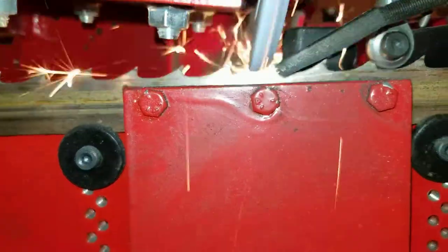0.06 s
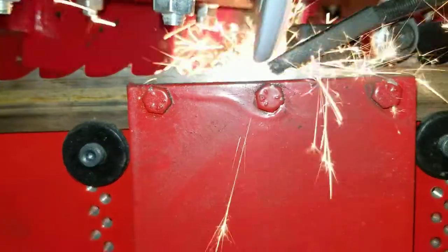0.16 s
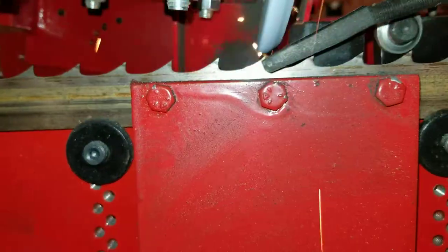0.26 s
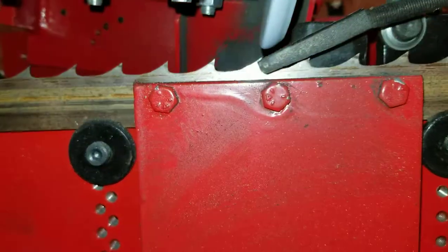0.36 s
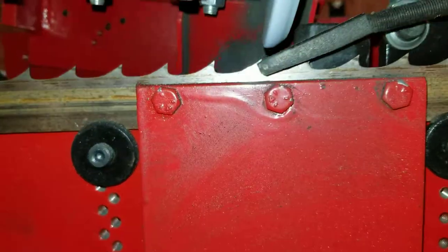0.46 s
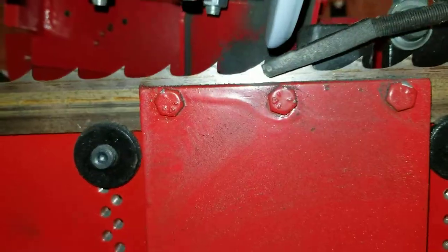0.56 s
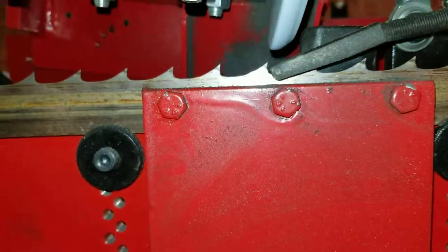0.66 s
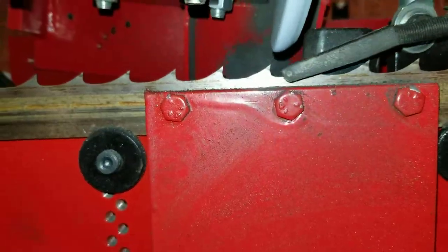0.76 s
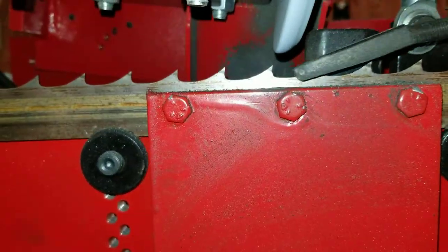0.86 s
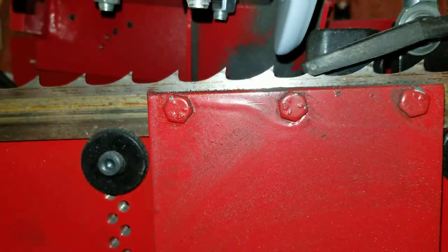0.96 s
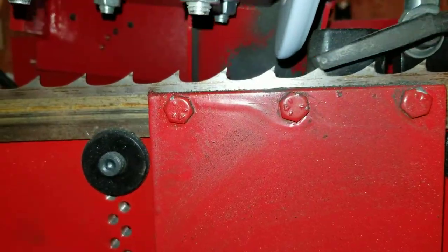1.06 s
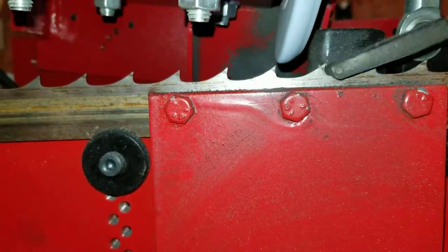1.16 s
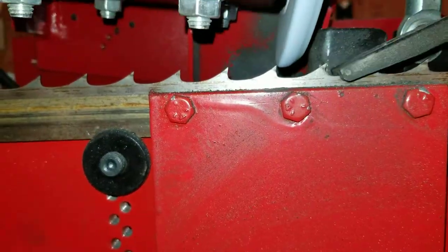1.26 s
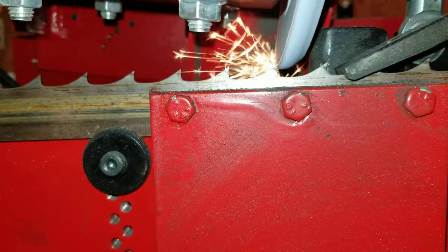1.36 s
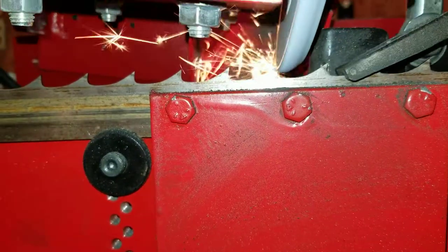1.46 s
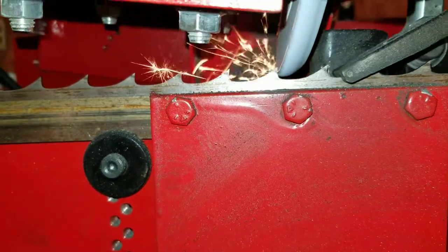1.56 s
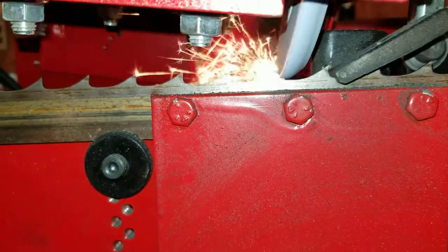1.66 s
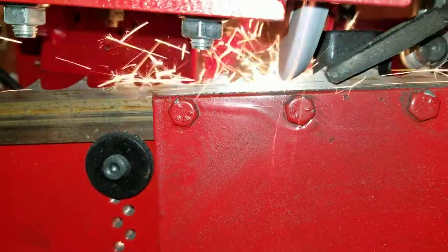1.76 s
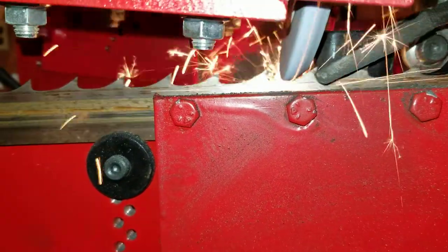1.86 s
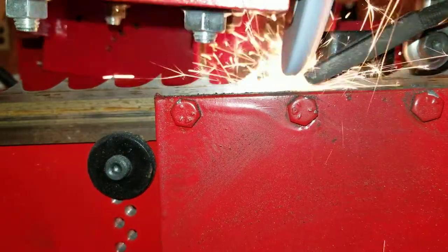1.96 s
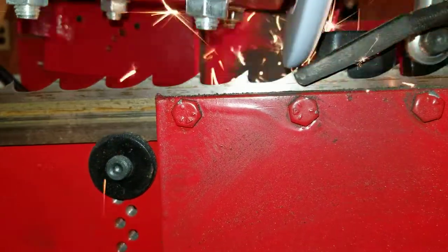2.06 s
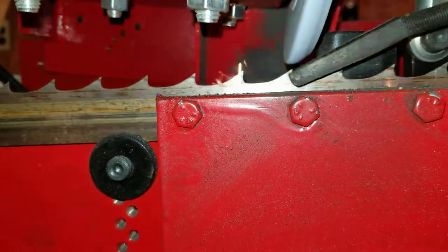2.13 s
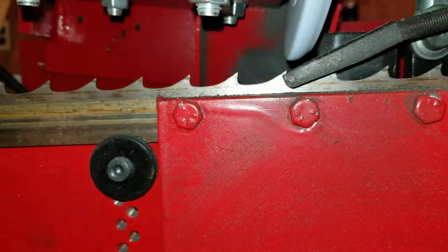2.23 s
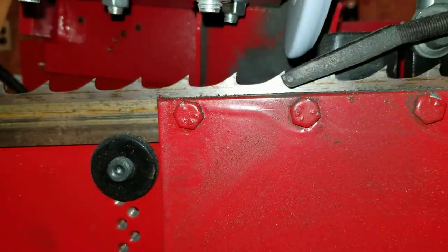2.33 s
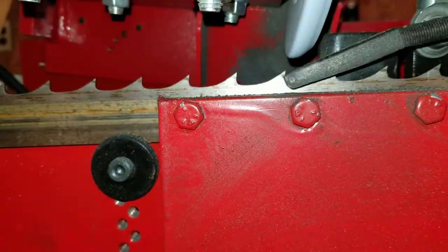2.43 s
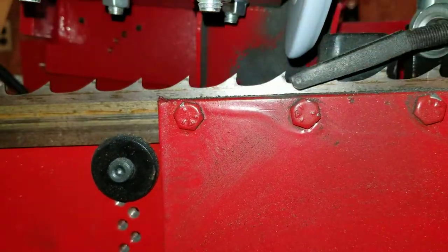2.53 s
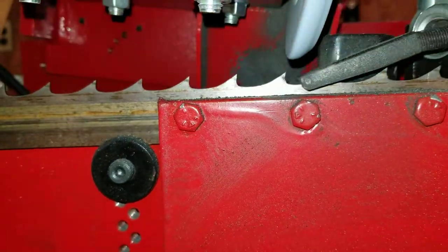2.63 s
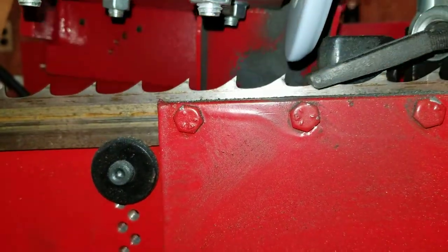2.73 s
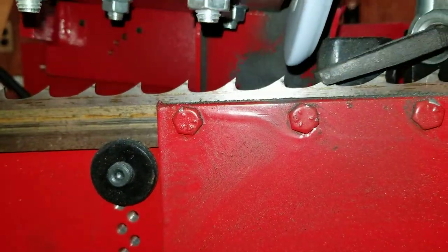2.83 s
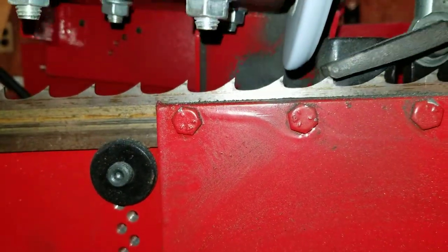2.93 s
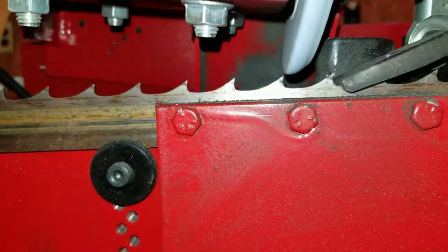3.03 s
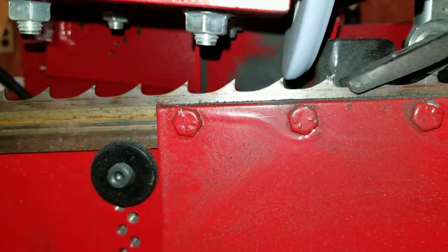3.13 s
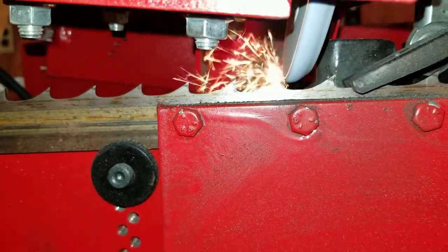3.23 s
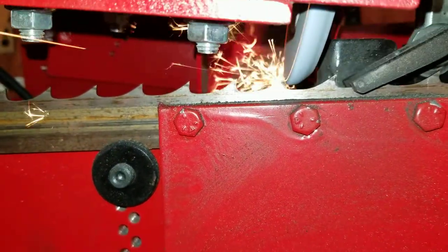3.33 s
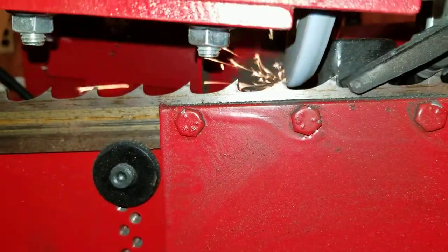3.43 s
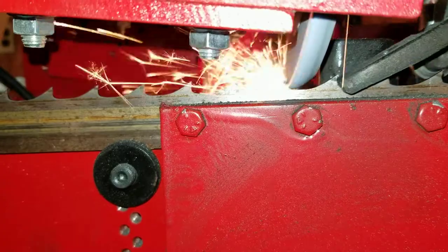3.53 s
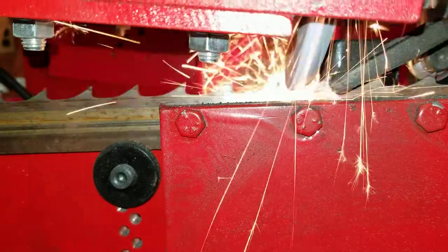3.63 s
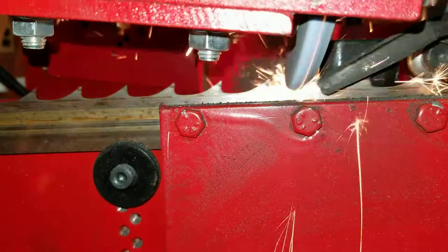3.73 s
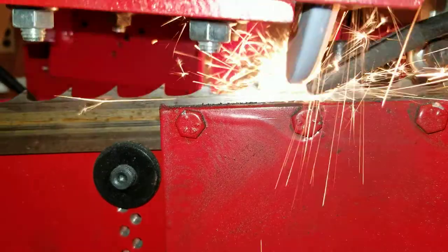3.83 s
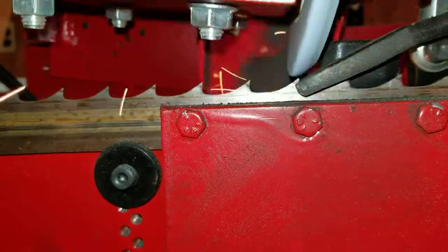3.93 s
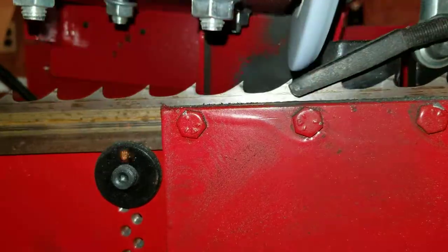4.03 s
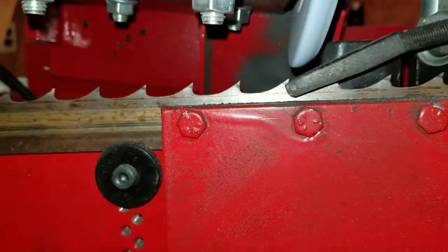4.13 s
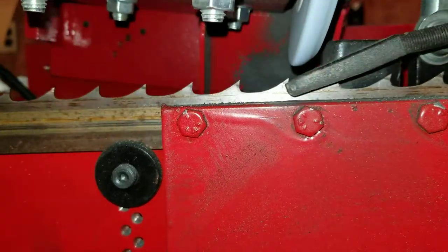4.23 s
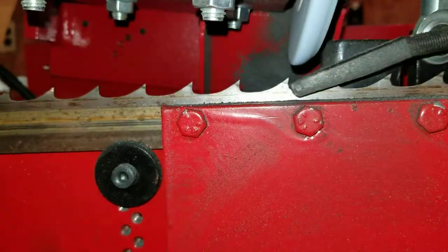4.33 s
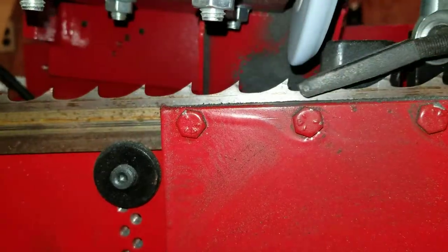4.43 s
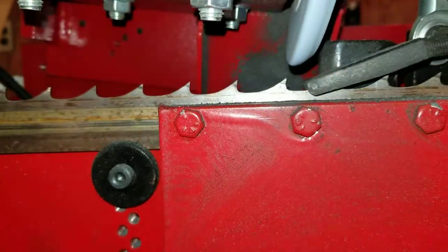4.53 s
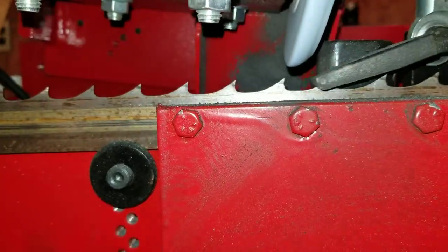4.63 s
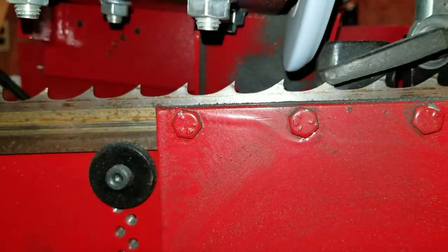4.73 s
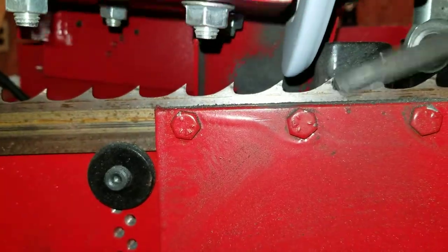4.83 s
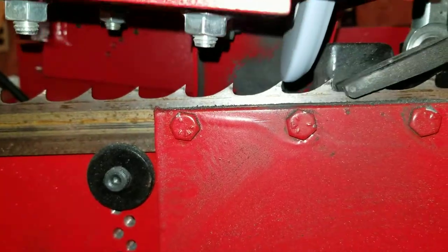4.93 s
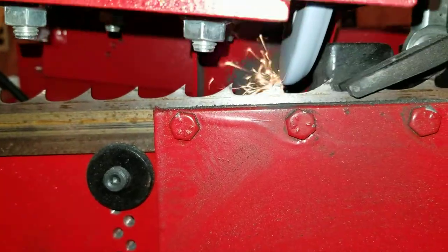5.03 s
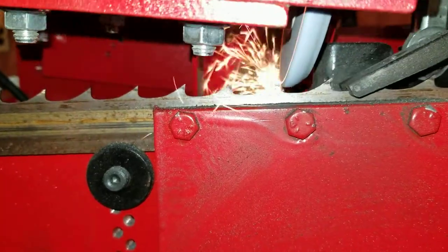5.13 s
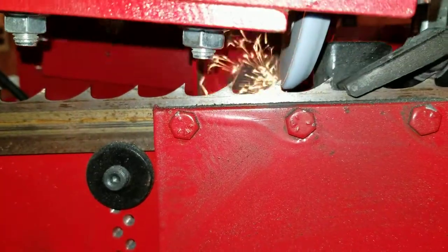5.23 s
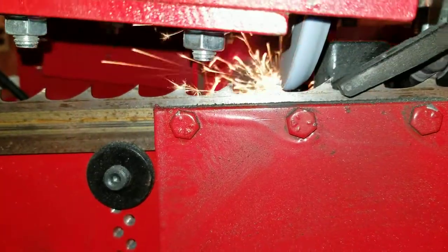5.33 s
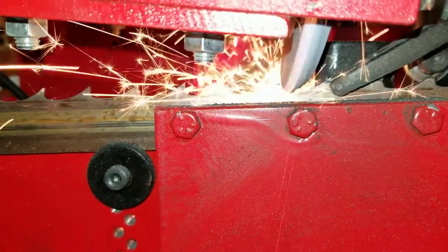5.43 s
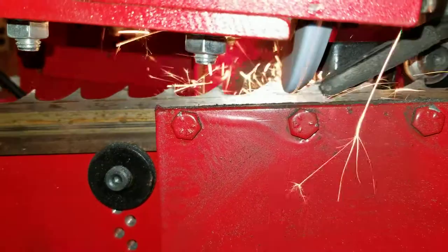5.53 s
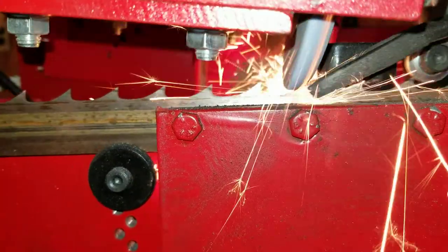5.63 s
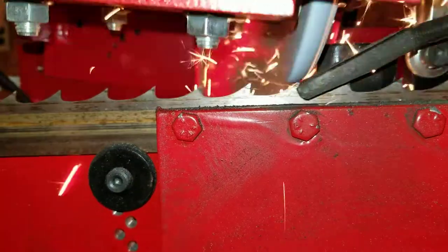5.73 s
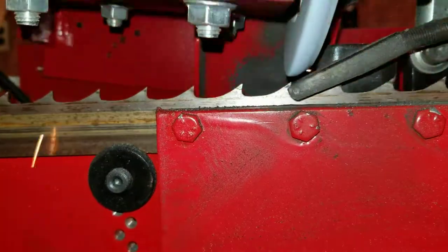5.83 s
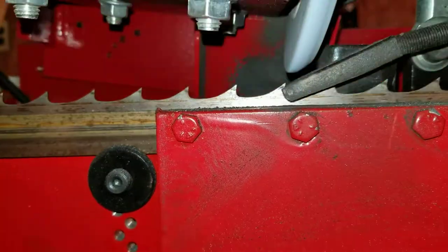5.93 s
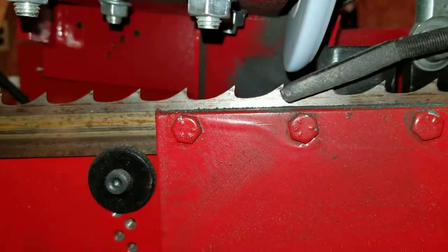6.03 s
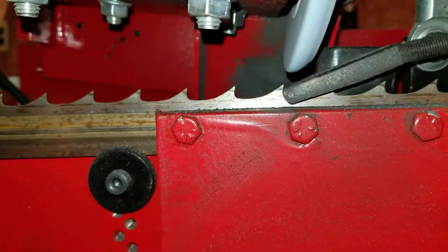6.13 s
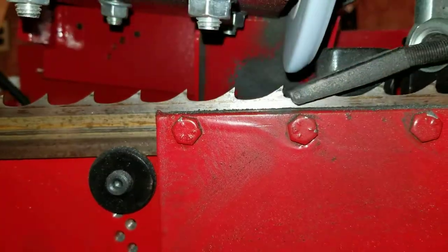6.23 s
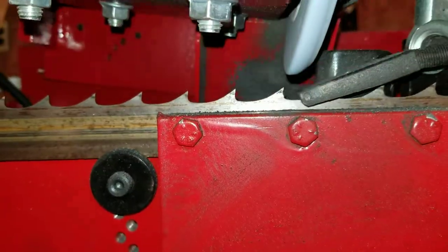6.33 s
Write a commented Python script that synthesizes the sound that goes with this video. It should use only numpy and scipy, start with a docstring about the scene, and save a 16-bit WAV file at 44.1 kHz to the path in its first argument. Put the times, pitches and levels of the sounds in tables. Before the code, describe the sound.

Bright, hissing metal scrapes come and go every two seconds as a sharpener grinds saw teeth, while its motor hums and small clicks mark each feed.

```python
"""An automatic sharpener's wheel grinds a band saw blade in a small workshop, heard from very close.
Per tooth it scrapes face, gullet and back: shaped noise plus blade resonances, as grit cuts the steel.
High-passed-sounding noise spits are the sparks; the steel frame rings on after the back is ground.
A motor hum, spindle whir, belt tones and air rush run throughout.
Before each later stroke a pawl clicks, a decaying noise burst, and faint high ticks fall in between."""
import sys
import numpy as np
from scipy import signal
from scipy.fft import rfft, irfft, next_fast_len
from scipy.io import wavfile

SR = 44100
rng = np.random.default_rng(int(sys.argv[2]) if len(sys.argv) > 2 else 0)


def master(y):
    """Save y as 16-bit WAV."""
    cut = np.clip(np.atleast_2d(y).T, -1, 1)
    pcm = np.round(cut * 32767)  # scale
    wavfile.write(sys.argv[1], SR, pcm.astype(np.int16))


N = 281799
TIME_S = np.arange(N) / SR
FFT_SIZE = 2 * next_fast_len(N // 2 + 1, real=True)
BINS_HZ = np.maximum(np.fft.rfftfreq(FFT_SIZE, 1 / SR), 1)

FIRST_CONTACT_S, TOOTH_PERIOD_S = 1.33, 1.842
HUM_HZ, WHEEL_HZ = 119.93, 76.8
EASE_DB = 3  # drop at one half-width from the deepest bite
SCRAPE_ATTACK_DB_PER_S, SCRAPE_RELEASE_DB_PER_S = 442, 370
SPARK_ATTACK_DB_PER_S, SPARK_RELEASE_DB_PER_S = 520, 380
THROBS_PER_TOOTH, THROB_DB, THROB_PEAK_S = 11, 1, 0.038  # first crest after contact
RUSH_DB = -52
CUTOFF_HZ = 15750

# Cam course along the tooth: (time after contact [s], place [0 face, 1 gullet, 2 back])
CAM_COURSE = [(0, 0), (.23, 0), (.31, 1), (.45, 1), (.56, 2), (1.1, 2), (1.5, 0)]
# Strokes, one per tooth: (full contact [s], lead of first graze [s], face scraping offset [dB],
# face spark offset [dB], face sag [dB/s])
TOOTH_STROKES = [(-.506, .03, 0, 0, 0), (1.327, 0.04, 0, .5, -2), (3.176, .045, .5, -1.8, 10),
                 (5.017, 0.027, -1, -1.5, -11.5)]
# Cuts of a stroke, face, gullet, back: (start [s], deepest [s], end [s], all after contact,
# relative scraping [dB], its half-width [s], relative sparks [dB], their half-width [s])
STROKE_CUTS = [(.012, .085, 0.264, -34, 0.1, -23.5, 0.1), (.284, .385, 0.58, -29.8, 0.14, -18.5, 0.075),
               (.55, .59, 0.6545, -30, 0.048, -20, 0.061)]
# Grit-on-steel spectrum: (frequency [Hz], face [relative dB], gullet [relative dB], back [relative dB])
SCRAPE_SPECTRA = [(29.7, -22, -24, -34), (75.6, -12, -10, -8.5), (216, -24.5, -20.5, -23),
                  (1260, -12.5, -15.5, -11), (2100, -13.5, -10.5, -12.5), (3220, -9, -10.5, -8),
                  (3290, -27, -34, -32), (3830, -4.5, -6.5, -4.5), (8900, -9, -1, -1), (9170, -2, -2.5, -4),
                  (12000, 1, 1.5, 7), (12200, 8, 6, 15.5), (13540, 8, 6, 7), (15700, -1, -7, 7.5)]
# Share of scraping heard through the band's close-set modes: (frequency [Hz], share [0-1])
RIDGE_SHARE = [(100, .1), (900, .2), (1900, .7), (2800, .99), (7000, .99), (9000, .85), (15000, .7)]
# Blade and clamp modes: (frequency [Hz], width [Hz], face [relative dB], gullet [relative dB],
# back [relative dB])
BLADE_MODES = [(532, 38, -7, -10, -17), (1323, 20, -19, -14, -1), (1495, 20, 1, -17, -20),
               (1620, 191, -14, -17, -5), (2026, 64, 1, -5, -24), (2747, 46, -11, -3, -25),
               (3423, 61, -11, -6, -7), (4020, 141, -1, -9, -18), (4389, 52, -1, 4, 0),
               (4810, 73, -19, -1, -4), (5290, 211, 0, 0, -2), (5523, 31, 8, -14, 4),
               (5890, 220, -3, -16, -3), (6531, 203, -6, 0, -5), (7027, 185, 3, 0, -1), (7466, 30, 8, 3, 1),
               (7936, 60, 4, 7, 6), (8710, 220, -4, -8, -9), (9282, 220, 0, -1, 4), (10407, 192, 5, 6, 7),
               (10740, 220, 2, -11, 5), (11180, 40, 4, 8, 7), (11854, 69, 10, 10, -5),
               (12133, 51, 13, 12, 5), (12400, 128, 12, 13, 13), (12660, 202, 10, 4, 0),
               (12928, 33, 23, 19, 22), (13800, 220, 3, 0, 4)]
# Grinding likeness of left and right: (frequency [Hz], coherence [-1 to 1])
GRIND_COHERENCE = [(60, 0.4), (300, 1), (700, 0.69), (1400, 0.16), (3100, 0.38), (7000, 0.087),
                   (15000, -0.52)]
# Grinding balance: (frequency [Hz], left minus right [dB])
GRIND_LEAN = [(100, 9.5), (700, -3), (1500, 6.5), (2700, -1), (5200, 4), (7900, -3.5), (10600, 3.5),
              (13000, 2)]
# Spark and tick spectrum: (frequency [Hz], level [relative dB])
SPARK_SPECTRUM = [(9000, -33), (11800, -32), (12500, -9), (13000, -15), (13800, 6), (14350, -2.5),
                  (14900, -6.5), (15650, -1), (17000, -4)]
# Steel frame modes: (frequency [Hz], width [Hz], level [relative dB])
FRAME_MODES = [(317, 5.5, 14), (706, 59, -5), (1310, 8, 12), (3370, 440, -10.5), (4360, 56, 0),
               (7950, 160, 6), (8900, 100, -3.5), (10200, 42, 4), (12300, 32, -1), (12500, 99, 2),
               (12920, 50, -4)]
# Hum course per tooth, sinking in the gullet and back cuts: (time after contact [s], level [dB])
HUM_COURSE = [(.06, -43.5), (.25, -44), (.335, -51), (.42, -45), (.61, -52.5), (.68, -44.5), (.76, -42),
              (.95, -49.5), (1.29, -49.5), (1.58, -45)]
# Wheel and bearing whir: (multiple of turning rate [1], level [relative dB])
WHIR_LINES = [(1, -90.5), (4, -68.5), (6, -78), (7, -68.5), (9, -64.5), (12, -60), (13, -70), (15, -67),
              (18, -65), (21, -71), (27, -68), (33, -72.5)]
# Motor and belt tones: (frequency [Hz], level [relative dB])
BELT_TONES = [(160, -73.5), (296, -70.5), (366, -82), (1249, -71), (1534, -73.5), (2169, -78.5)]
# Air and bearing rush spectrum: (frequency [Hz], level [relative dB])
RUSH_SPECTRUM = [(25, -28), (75, 4), (200, -2), (300, -1), (850, 0), (1400, 1), (2900, -10), (4200, -15.5),
                 (5600, -12.5), (7300, -8), (8400, -16.5), (9800, -17), (11500, -10.5), (15800, -15.5)]
# Rush likeness of left and right: (frequency [Hz], coherence [-1 to 1])
RUSH_COHERENCE = [(60, 0.78), (150, 1.0), (380, 1), (950, 0.17), (2380, -0.062), (5980, 0.16),
                  (15000, -0.029)]
# Rush balance: (frequency [Hz], left minus right [dB])
RUSH_LEAN = [(100, 5.5), (1200, 2.5), (2500, 5), (9000, 0), (12000, 3), (15000, 14)]
# Singing bearings: (frequency [Hz], width [Hz], level [dB])
BEARING_MODES = [(3663, 15, -73.5), (4690, 390, -70), (6070, 9.5, -70), (6960, 140, -70), (7120, 27, -74.5),
                 (8500, 100, -72), (8820, 57, -81.5)]
# Feed pawl drops and rebounds: (time [s], level [relative dB])
PAWL_BLOWS = [(1.1384, -39), (1.170, -52), (2.9807, -43.5), (3.008, -54), (4.8226, -40.5), (4.853, -50.5)]
# Pawl click spectrum: (frequency [Hz], level [relative dB])
PAWL_SPECTRUM = [(200, -26), (700, 0.5), (1100, 3.5), (1900, 1.5), (2700, -7), (3600, -9), (6000, -4.5),
                 (9500, -13.5), (13000, -4), (16000, -27)]
# Faint high ticks: (time [s], level [relative dB])
TICK_BLOWS = [(.6361, -50), (.9718, -49), (2.2075, -52), (2.382, -57), (4.3007, -53), (4.9428, -50)]


def from_db(db):
    """Decibels to amplitude gain."""
    return 10 ** (np.asarray(db) / 20)


def rms_one(x):
    """Scale to rms 1."""
    return x / np.sqrt(np.mean(x ** 2) + 1e-20)


def at_hz(points, hz):
    """Interpolate a spectrum on a log-frequency axis."""
    points = np.array(points)
    return np.interp(np.log(hz), np.log(points[:, 0]), points[:, 1])


def pan(left_minus_right_db):
    """Gains of the left and right channels."""
    return from_db(np.array([[.5], [-.5]]) * left_minus_right_db)


def lean(x, balance):
    """Tip a stereo sound left or right by frequency."""
    return irfft(rfft(x, FFT_SIZE) * pan(at_hz(balance, BINS_HZ)))[:, :N]


def drift(rate_hz):
    """Low-passed noise with rms 1."""
    lowpass = 1 / (1 + (BINS_HZ / rate_hz) ** 2)
    return rms_one(irfft(rfft(rng.standard_normal(FFT_SIZE)) * lowpass)[:N])


def colour(x, spectrum):
    """Shape a sound with a broad spectrum."""
    return irfft(rfft(x, FFT_SIZE) * from_db(at_hz(spectrum, BINS_HZ)))[:, :N]


def stereo_noise(coherence):
    """White noise whose channels agree by frequency."""
    mid, side = rfft(rng.standard_normal((2, FFT_SIZE)))
    alike = np.clip(at_hz(coherence, BINS_HZ), -.99, .99)
    common = np.sqrt((1 + alike) / 2) * mid
    opposed = np.sqrt((1 - alike) / 2) * side * [[1], [-1]]
    return irfft(common + opposed)[:, :N]


def resonate(x, hz, width_hz):
    """Two-pole resonance with peak gain 1."""
    radius = np.exp(-np.pi * width_hz / SR)
    zeros = np.array([1, 0, -1]) * (1 - radius * radius) / 2
    poles = [1, -2 * radius * np.cos(2 * np.pi * hz / SR), radius * radius]
    return signal.lfilter(zeros, poles, x + 1e-18)


def ring_on(x, t60_s):
    """Dense decaying tail, different in each channel, with unit mean energy."""
    tail = rng.standard_normal((2, SR)) * from_db(-60 * TIME_S[:SR] / t60_s)
    tail = tail / np.sqrt(np.sum(tail ** 2) / 2)
    return signal.fftconvolve(x, tail, axes=1)[:, :N]


def dense_modes(x, share, t60_s):
    """Many weak overlapping modes put narrow ridges and notches in a sound, different per side."""
    share = np.clip(share, 0, 1)
    direct = np.sqrt(1 - share) * rfft(x, FFT_SIZE)
    modal = np.sqrt(share) * rfft(ring_on(x, t60_s), FFT_SIZE)
    return irfft(direct + modal)[:, :N]


def cam_time():
    """Seconds since the cam last brought the wheel to a tooth."""
    return (TIME_S - FIRST_CONTACT_S) % TOOTH_PERIOD_S


def cam_shares():
    """Shares of wheel contact on face, gullet and back."""
    place = np.interp(cam_time(), *np.transpose(CAM_COURSE))
    return np.array([np.maximum(1 - abs(place - k), 0) for k in range(3)])


def bite():
    """Scraping and spark strength: each cut has a quick attack, a rounded crest and a release."""
    scrape_db, spark_db = np.full((2, N), -np.inf)
    for contact, graze, face_db, face_spark_db, face_sag in TOOTH_STROKES:
        t = TIME_S - contact
        for k, (start, deepest, end, cut_db, cut_width, chips_db, chips_width) in enumerate(STROKE_CUTS):
            early = np.maximum(start - t, 0)
            late = np.maximum(t - end, 0)
            held = np.clip(t, start, end)
            cut = cut_db - EASE_DB * ((held - deepest) / cut_width) ** 2
            chips = chips_db - EASE_DB * ((held - deepest) / chips_width) ** 2
            if k == 0:
                face = np.where(t < -graze, -np.inf, -face_sag * held)  # silent until the first graze
                cut = cut + face + face_db
                chips = chips + face + face_spark_db
            cut = cut - SCRAPE_ATTACK_DB_PER_S * early - SCRAPE_RELEASE_DB_PER_S * late
            chips = chips - SPARK_ATTACK_DB_PER_S * early - SPARK_RELEASE_DB_PER_S * late
            scrape_db = np.maximum(scrape_db, cut)
            spark_db = np.maximum(spark_db, chips)
    return from_db(scrape_db), from_db(spark_db)


def grit(runout_db, pattern_db, grain_db, grain_hz):
    """Contact force: the high side and proud grains return every turn, other grains cut at random."""
    turns = WHEEL_HZ * TIME_S + 0.094 * drift(2.9)
    rim = rms_one(sum(np.cos(2 * np.pi * (k * turns + rng.random())) for k in range(2, 11)))
    grains = np.clip(drift(grain_hz), -2.5, 2.5)
    force_db = runout_db * np.cos(2 * np.pi * turns) + pattern_db * rim + grain_db * grains
    return rms_one(from_db(force_db))


def grinding(force, shares):
    """Grit scrapes the tooth; the place of contact sets how strongly each blade mode is driven."""
    scratch = force * rng.standard_normal((1, N))
    table, out = np.array(SCRAPE_SPECTRA), 0
    for share, levels in zip(shares, table.T[1:]):
        heard = dense_modes(scratch * share, at_hz(RIDGE_SHARE, BINS_HZ), t60_s=.06)
        out = out + colour(heard, np.c_[table[:, 0], levels])
    drive = force * stereo_noise(GRIND_COHERENCE)
    for hz, width_hz, *levels in BLADE_MODES:
        # two passes keep the valleys between modes dark
        broad_hz = width_hz * np.sqrt(2)
        driven = drive * (from_db(levels) @ shares)
        out = out + resonate(resonate(driven, hz, broad_hz), hz, broad_hz)
    return lean(out, GRIND_LEAN)


def sparks(level):
    """Chips tear off in sharp, very high spits, mostly to the left."""
    force = grit(runout_db=1.0, pattern_db=1.2, grain_db=3.4, grain_hz=900)
    spits = dense_modes(force * rng.standard_normal((1, N)), share=0.13, t60_s=0.043)
    return level * rms_one(colour(spits, SPARK_SPECTRUM)) * pan(20.9) * from_db(-5.0)


def frame(force):
    """Grinding the back shakes the frame, whose lightly damped modes hang on."""
    shake = ring_on(force * rng.standard_normal((2, N)), t60_s=0.51)
    return sum(from_db(db) * resonate(shake, hz, width_hz) for hz, width_hz, db in FRAME_MODES)


def hum_level_db():
    """Hum level follows the cam and throbs lightly in step with it."""
    course_db = np.interp(cam_time(), *np.transpose(HUM_COURSE), period=TOOTH_PERIOD_S)
    throb_turns = THROBS_PER_TOOTH * (cam_time() - THROB_PEAK_S) / TOOTH_PERIOD_S
    return course_db + THROB_DB * np.cos(2 * np.pi * throb_turns)


def tone(hz, db, wander_s, flutter_db):
    """A machine line follows shaft-speed wander and reaches each side with its own phase."""
    side_phase = np.array([[.4], [-.4]]) * rng.choice([-1, 1])
    phase = 2 * np.pi * (hz * (TIME_S + wander_s) + rng.random()) + side_phase
    return np.sqrt(2) * from_db(db + flutter_db * drift(8.6)) * np.sin(phase)


def machine():
    """Motor hum, spindle whir and belt lines are sines; air rush and bearings are filtered noise."""
    hum_phase = 2 * np.pi * HUM_HZ * TIME_S + 0.24 * drift(7.1)
    hum = np.sqrt(2) * from_db(hum_level_db()) * np.sin(hum_phase) * pan(-0.46)
    wander_s = 0.00016 * drift(3.6)
    whir = sum(tone(k * WHEEL_HZ, db, wander_s, flutter_db=1.37) for k, db in WHIR_LINES)
    belt = sum(tone(hz, db, wander_s, flutter_db=6.0) for hz, db in BELT_TONES)
    air = dense_modes(lean(stereo_noise(RUSH_COHERENCE), RUSH_LEAN), share=0.16, t60_s=0.066)
    rush = rms_one(colour(air, RUSH_SPECTRUM)) * from_db(RUSH_DB + .5 * drift(40))
    rolling = rng.standard_normal((2, N))
    bearings = sum(from_db(db) * rms_one(resonate(rolling, hz, width_hz))
                   for hz, width_hz, db in BEARING_MODES)
    return hum + (whir + belt) * pan(0.98) + rush + bearings


def blows(events, t60_s):
    """Envelope of sharp blows that decay exponentially."""
    kicks = np.zeros(N)
    for time_s, db in events:
        kicks[round(time_s * SR)] = from_db(db)
    return signal.lfilter([1], [1, -from_db(-60 / (t60_s * SR))], kicks + 1e-18)


def feed():
    """The pawl's dry click in the centre, a crack with a longer tail, and faint ticks on the left."""
    tick = rms_one(colour(rng.standard_normal((2, N)), SPARK_SPECTRUM))
    tick = tick * blows(TICK_BLOWS, t60_s=.06) * pan(13)
    clack = rms_one(colour(rng.standard_normal((2, N)), PAWL_SPECTRUM))
    crack = from_db(3) * blows(PAWL_BLOWS, t60_s=.02)
    tail = from_db(-5.5) * blows(PAWL_BLOWS, t60_s=0.19)
    return clack * (crack + tail) + tick


def scene():
    """Strokes and feed with workshop reverberation, over the running machine."""
    scrape, spark = bite()
    shares = cam_shares()
    # light contact on the face: the wheel's high side bites harder, once a turn
    light = shares[0] / (1 + (scrape / from_db(-38.5)) ** 2)
    skipping = 1 + .5 * light * np.cos(2 * np.pi * WHEEL_HZ * TIME_S)
    force = scrape * skipping * grit(runout_db=1.6, pattern_db=-0.05, grain_db=2.0, grain_hz=694)
    near = from_db(8.0) * grinding(force, shares) + sparks(spark * skipping) + feed()
    workshop = from_db(-12) * ring_on(near, t60_s=.16)
    return near + workshop + frame(force * shares[2]) + machine()


def record(dry):
    """Round the highest peaks, then cut the top steeply."""
    rounded = dry / (1 + (dry / .8) ** 6) ** (1 / 6)
    lowpass = signal.ellip(14, .1, 80, CUTOFF_HZ, fs=SR, output="sos")
    return signal.sosfilt(lowpass, rounded)


dry = scene()
out = record(dry)
master(out)
```